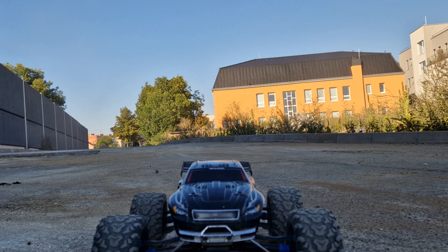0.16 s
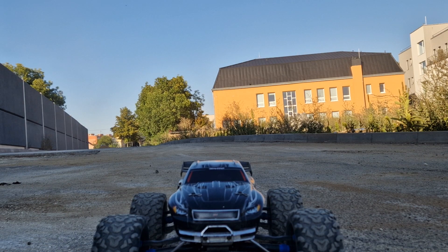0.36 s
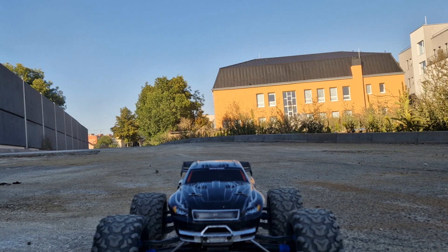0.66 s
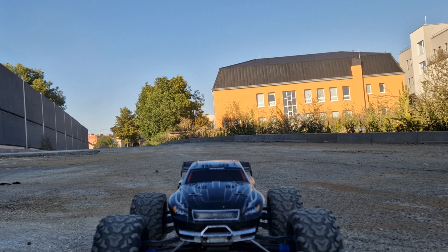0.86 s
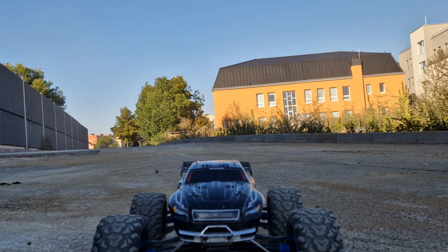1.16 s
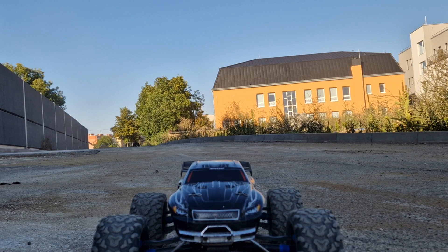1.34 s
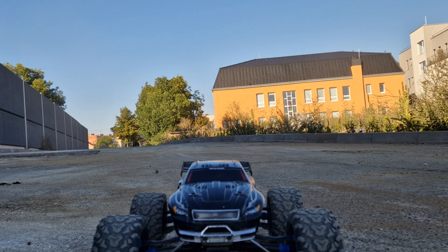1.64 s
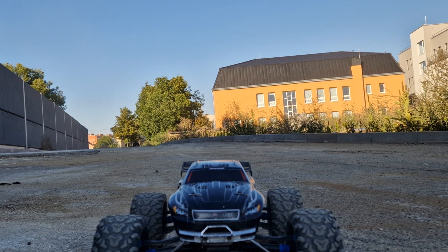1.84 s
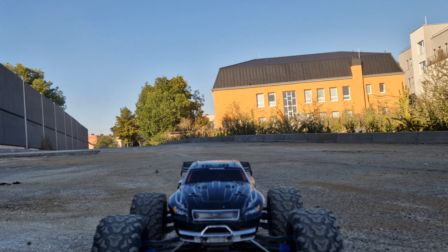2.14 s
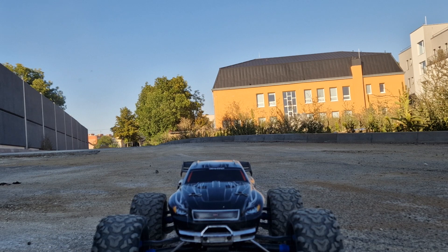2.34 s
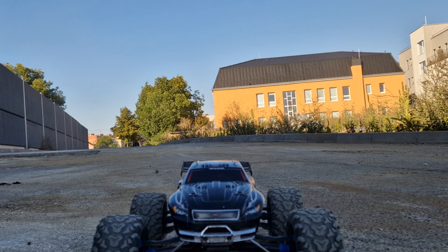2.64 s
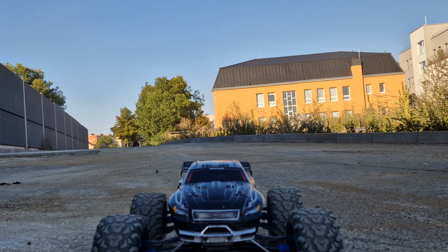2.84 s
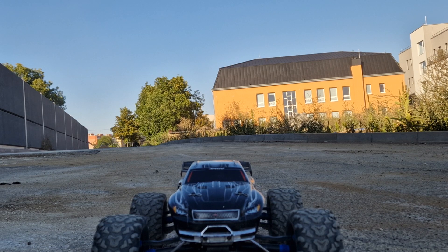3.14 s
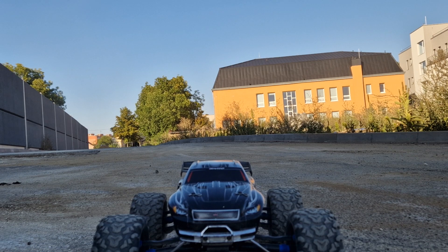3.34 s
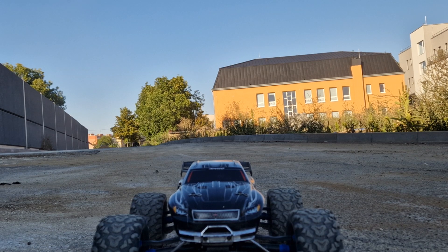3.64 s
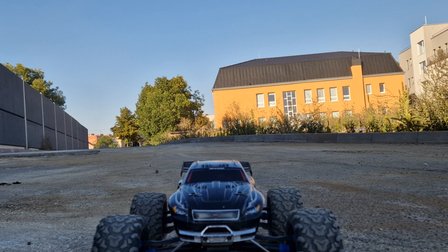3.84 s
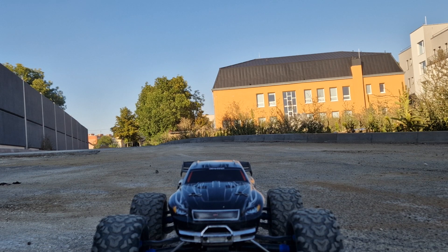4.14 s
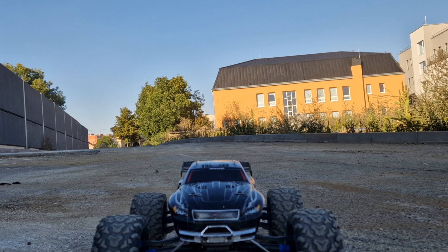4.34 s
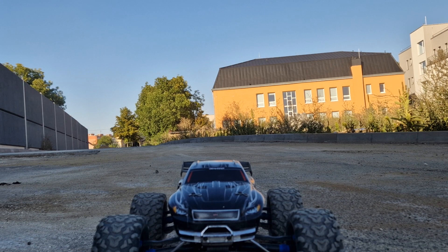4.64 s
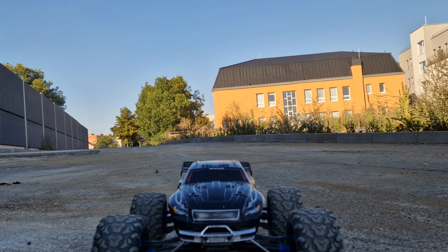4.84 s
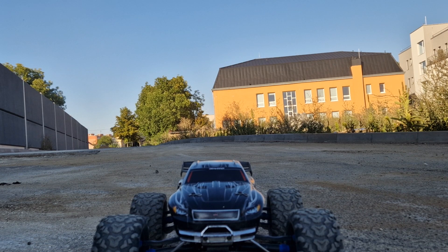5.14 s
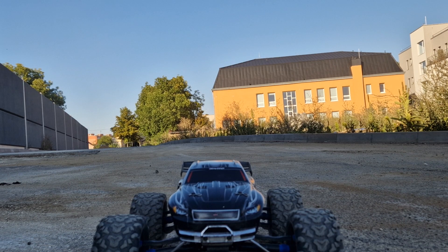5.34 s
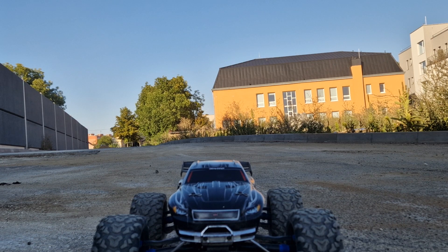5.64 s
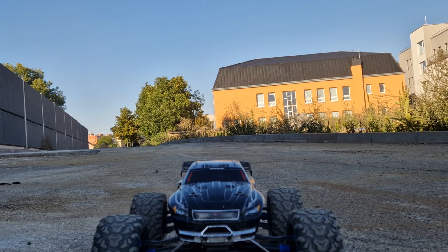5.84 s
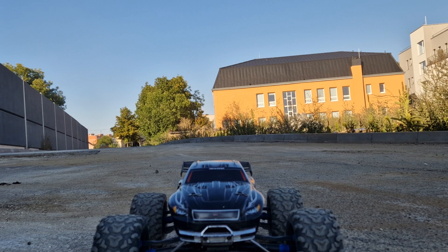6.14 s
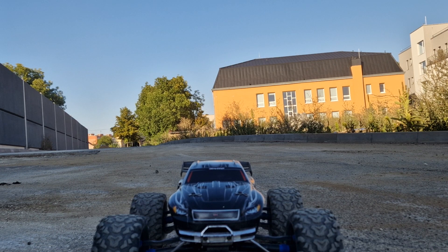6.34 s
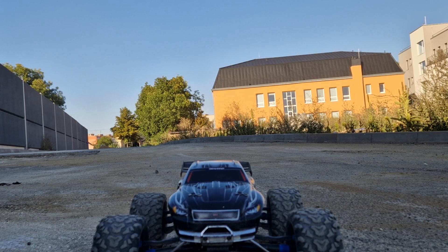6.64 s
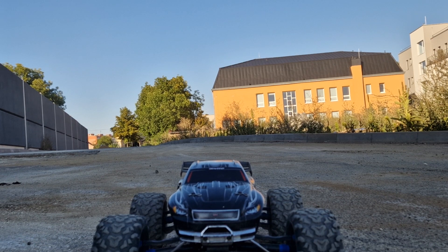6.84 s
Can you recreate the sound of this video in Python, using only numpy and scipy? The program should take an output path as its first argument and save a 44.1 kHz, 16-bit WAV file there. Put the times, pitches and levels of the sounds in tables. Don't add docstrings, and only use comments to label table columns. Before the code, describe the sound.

Buzzing, crackling idle of a small model truck engine cuts out midway; quiet yard follows with faint ticks and an approaching car.

```python
import sys
import numpy as np
from scipy import signal
from scipy.fft import rfft, irfft, next_fast_len
from scipy.io import wavfile
from scipy.ndimage import uniform_filter1d, map_coordinates

SR = 44100
rng = np.random.default_rng(int(sys.argv[2]) if len(sys.argv) > 2 else 0)


def gain_from_db(level_db):
    decades = np.asarray(level_db, float) / 20
    return 10 ** decades


def unload_wav(signal):
    wavfile.write(
        sys.argv[1],
        SR,
        np.round(np.clip(np.atleast_2d(signal).T, -1, 1) * 32767).astype(np.int16),
    )


N = 308259
T = np.arange(N) / SR
STALL_S = 3.618


def level(x, db):
    return x * gain_from_db(db) / np.sqrt(np.mean(x ** 2))


def noise(points, channels=1):
    hz, db = np.transpose(points)
    size = next_fast_len(N)
    f = np.fft.rfftfreq(size, 1 / SR) + 1
    shape = gain_from_db(np.interp(np.log(f), np.log(hz), db, left=-90, right=-90))
    white = rng.standard_normal((channels, size))
    return level(irfft(rfft(white) * shape, size)[:, :N], 0)


def walk(rate_hz):
    k = int(SR / rate_hz)
    held = np.repeat(rng.standard_normal(N // k + 1), k)
    return 1.3 * uniform_filter1d(uniform_filter1d(held, k), k)[:N]


def strike(s, size, hz, t60_s):
    pole = 2j * np.pi * hz / SR - np.log(1000) / (t60_s * SR)
    at = np.clip(np.ceil(s * SR), 0, N - 1)
    x = np.zeros(N, complex)
    np.add.at(x, at.astype(int), size * np.exp(pole * (at - s * SR)))
    end = int(at.max() + 2 * t60_s * SR)
    x[:end] = signal.lfilter([1], [1, -np.exp(pole)], x[:end])
    return x


def pan(x, left_minus_right_db):
    return x * gain_from_db(np.array([[left_minus_right_db], [-left_minus_right_db]]) / 2)


def late(x, samples):
    return map_coordinates(x, [np.arange(N) - samples], order=1)


# time in seconds, speed in turns/s.
CRANK_SPEED = [
    (0, 108),
    (2.55, 106),
    (2.8, 103),
    (3.39, 100),
    (3.44, 91),
    (3.62, 85),
]
# first burn in seconds, its ring in dB, spacing in turns, change in dB per burn.
BURN_RUNS = [(-.0216, -26, 3, 0), (.1541, -22, 3, -1.8), (.309, -26.5, 3, 2.5), (.4177, -29, 4, 2),
             (.5191, -25, 3, -2.5), (.6121, -21, 3, -3), (.7426, -19, 3, -7), (.8245, -20, 3, -6),
             (.9173, -23, 4, 2), (.9813, -23, 3, -1.4), (1.0924, -22, 3.3, -1.4), (1.2211, -22, 3, -4),
             (1.3138, -23, 3, -.7), (1.547, -23, 4, .7), (1.6497, -20, 3, -5), (1.7424, -24, 3.4, -2),
             (1.8651, -25, 4, 2), (1.9305, -18, 3.55, -2.2), (2.1353, -21, 3.45, -1.5),
             (2.2775, -21, 3, -2.5), (2.4284, -19, 3.3, -1), (2.6158, -24, 3.4, -2),
             (2.6838, -21, 3.8, -1.5), (2.8676, -24, 2, 0), (2.9546, -20, 3, -7), (3.0127, -25, 2, .4),
             (3.1198, -24, 2, 1), (3.1869, -22.5, 3.2, -.3), (3.4707, -23, 3, 1.5), (3.5849, -20, 4, 0)]


def turns():
    scatter_db, stray_db, stray_share = 1.5, -30, .3
    kick, kick_kept, kick_slow_power = .055, .55, 3.0
    s, db, every, change_db = np.transpose(BURN_RUNS)
    speed_s, speed = np.transpose(CRANK_SPEED)
    edge = np.r_[s, STALL_S]
    span = np.diff(edge)
    turned = np.cumsum(np.interp(T + s[0], speed_s, speed)) / SR
    count = np.round(np.diff(np.interp(edge, T + s[0], turned))).astype(int)
    run = np.repeat(np.arange(len(s)), count)
    k = np.concatenate([np.arange(c) for c in count])
    nth = np.round(k / every[run])
    due = (np.round(nth * every[run]) == k) & (k < count[run] - 1)
    luck = rng.random(len(k))
    scatter = scatter_db * rng.standard_normal(len(k)) * (k > 0)
    ring_db = np.where(due, db[run] + nth * change_db[run], stray_db) + scatter
    steady = s[run] + span[run] * k / count[run]
    slow = speed[0] / np.interp(steady, speed_s, speed)
    burn = gain_from_db(ring_db + 23) * (due | (luck * slow ** 10 < stray_share))
    push = signal.lfilter([1], [1, -kick_kept], burn)
    period = slow * (1 - kick * slow ** kick_slow_power * push)
    gone = np.cumsum(period) - period
    share = (gone - gone[k == 0][run]) / np.bincount(run, period)[run]
    return s[run] + span[run] * share, burn


# frequency in Hz, t60 in seconds, level in dB on a lean turn,
# level in dB on a hard burn, left minus right in dB, left lead in radians.
PIPE_MODES = [(375, 0.028, -30, -56, 7, 0.24), (483, 0.047, -23.5, -25, 3, 0.22),
              (575, 0.028, -17.5, -33, 0.5, 0.03), (670.6, 0.038, -22.5, -22, -1.5, 0.55),
              (1051.6, 0.04, -19.5, -27.5, 4.5, -1.54), (1159, 0.026, -80, -24, 6.5, 2),
              (1474, 0.046, -26, -32, 16.5, -0.05), (1545, 0.043, -25, -15.5, -1.5, -0.01),
              (1618, 0.057, -18.5, -19.5, 2.5, 0.56), (1806, 0.12, -35, -28.5, 8, 0.5),
              (2125, 0.022, -34, -32.5, -11.5, 3.5), (2375, 0.059, -38.5, -26.5, 3, 1.8),
              (2507, 0.037, -48.5, -37.5, -9.5, 3.5), (3019, 0.13, -52, -53.5, 19, 0.1),
              (3325, 0.051, -40.5, -43, -1, -0.3), (5490, .021, -33.5, -18.5, 4.5, -0.25),
              (5180, 0.012, -30, -27, -3, 3.5), (3900, 0.054, -57.5, -61, -17, .3),
              (7890, 0.027, -43, -38, 12, -2.6)]


def pipe_and_shell(s, burn, slow, size_luck, start_luck):
    burn_lead_s, puff_lead_s, low_lead_s = .0001, .0013, .0009
    pressure = np.tanh(signal.lfilter([0, 1], [1, -.4], burn))
    early_s = .00035 * pressure + .00007 * slow ** 5 * size_luck
    shell = strike(s - burn_lead_s, gain_from_db(-23) * burn, 1360, 0.0015).imag
    lows = 0
    for hz, t60_s, lean_db, burn_db, pan_db, lead_rad in PIPE_MODES:
        low = hz < 900
        rough = min(hz / 1500, 1)
        own_size, own_start = hz / 2500 * rng.standard_normal((2, len(s)))
        scatter_db = 1.2 * rough * size_luck + 1.6 * own_size
        fullness = slow ** np.interp(hz, [350, 500, 1050, 1510], [1.0, 0.0, 3.5, -2.5])
        soft = gain_from_db(lean_db + scatter_db) * np.clip(1 - 0.71 * burn, 0, 1) * fullness
        hard = gain_from_db(burn_db + scatter_db / 3) * burn ** np.clip(hz / 5500, .5, 1)
        start = s - (low_lead_s if low else puff_lead_s) + .00015 * rough * start_luck + .000025 * own_start
        start = start - early_s * (hz < 1300)
        hard_start = start if low else s - burn_lead_s
        ring = strike(np.r_[start, hard_start], np.r_[soft, hard], hz, t60_s)
        ring = ring - strike(start, soft, hz, 0.0014 + hz / 3400000.0)
        swell_t60_s = 0.0041 if hz > 4500 else .002 if low else 0.00088
        ring = ring - strike(hard_start, hard, hz, swell_t60_s)
        turned = ring * np.exp(.5j * lead_rad * np.array([[1], [-1]]))
        mode = pan(turned.imag, pan_db)
        if low:
            lows = lows + mode
        else:
            shell = shell + mode
    lows = signal.sosfilt(signal.cheby1(6, 1, 290, "high", fs=SR, output="sos"), lows)
    return lows + signal.lfilter(*signal.butter(1, 500, "high", fs=SR), shell)


# frequency in Hz, t60 in seconds, level in dB.
CHASSIS_MODES = [(109.2, 0.051, -29), (213, 0.044, -35.5)]


def chassis_thump(s, size_luck):
    return -sum(strike(s, gain_from_db(db + 1.2 * size_luck), hz, t60_s).imag for hz, t60_s, db in CHASSIS_MODES)


# frequency in Hz, t60 in seconds, level in dB.
INTAKE_MODES = [(7430, 0.036, -45), (8300, 0.0022, -28.5), (9540, 0.0054, -46), (15000, .015, -54)]
# frequency in Hz, density in dB per Hz.
GAS_COLOUR = [(1100, 9), (1800, -13), (2600, -2), (3600, -10.5), (4400, -12.5), (6000, -10), (8000, -22.5),
              (9000, -23.5), (10400, -10), (11500, -22.5), (16500, -18.5)]


def gas(s, burn, start_luck):
    rings = 0
    for hz, t60_s, db in INTAKE_MODES:
        size = gain_from_db(db + 2.5 * rng.standard_normal(len(s)))
        rings = rings + strike(s - .0028, size, hz, t60_s).imag
    intake = strike(s - .003, gain_from_db(1.7 * start_luck), 0, 0.022).real
    blast = strike(s - .0004, 0.47 * burn, 0, 0.13).real
    running = np.clip((STALL_S - T) / 0.022, 0, 1)
    flow = .5 * running + intake + blast
    shared = noise(GAS_COLOUR)[0] * gain_from_db(-40.0) * flow + rings
    apart = noise(GAS_COLOUR, channels=2) * gain_from_db(-39.5) * flow
    return pan(apart + np.array([late(shared, 0.98), shared]), 1.0)


# left delay in ms, right delay in ms, level in dB.
ECHOES = [
    (0.311, 0.78, -22),
    (1.296, 0.889, -13),
    (2.9, 3.6, -19.5),
]


def engine():
    s, burn = turns()
    slow = CRANK_SPEED[0][1] * np.gradient(s)
    size_luck, start_luck = rng.standard_normal((2, len(s)))
    out = pipe_and_shell(s, burn, slow, size_luck, start_luck)
    out = out + chassis_thump(s, size_luck) + gas(s, burn, start_luck)
    echoes = 0
    for left_ms, right_ms, db in ECHOES:
        delayed = [late(c, ms * SR / 1000) for c, ms in zip(out, (left_ms, right_ms))]
        echoes = echoes + gain_from_db(db) * np.array(delayed)
    return out + echoes


# time in seconds, level in dB, centre in Hz, width in Hz,
# t60 in seconds, left minus right in dB.
SCUFFS = [(3.62, -19.5, 2980, 9200, 0.04, 3.5), (3.629, -42, 2950, 8760, 0.27, 2),
          (3.672, -44, 4942, 9107, 0.067, 0), (3.68, -64, 3700, 500, 0.74, 18),
          (3.735, -62, 5000, 12000, .2, 6), (3.815, -57, 3500, 9000, 0.16, 6),
          (4.05, -63, 4000, 9000, .1, 4), (4.572, -49.5, 2480, 4470, 0.084, 12),
          (4.587, -50.5, 3501, 4498, .05, 12), (5.1971, -40, 3503, 3960, 0.0054, 0),
          (5.2, -46, 2800, 3000, 0.035, 6), (5.206, -30, 1670, 1800, 0.026, 1),
          (5.2062, -44.5, 4498, 6000, 0.023, -2)]


def scuffs():
    out = 0
    for s, db, hz, width_hz, t60_s, pan_db in SCUFFS:
        bottom_hz = max(hz - width_hz / 2, hz / 5) / 2
        colour = [(bottom_hz, -24), (hz, 0), (hz + width_hz, -12), (hz + 3 * width_hz, -40)]
        fade = strike(np.array([s]), gain_from_db(db), 0, t60_s).real
        out = out + pan(noise(colour, channels=2) * fade, pan_db)
    return out


# time in seconds, level in dB, third-mode gain in dB, fourth-mode gain in dB.
PINGS = [
    (4.886, -56.5, 4, -1),
    (4.898, -60, 10, -8),
    (6.884, -41.5, -14, 4),
    (6.895, -50, -12, 11),
    (6.943, -45, -14, -10),
]
# frequency in Hz, level in dB, t60 in seconds.
PING_MODES = [(3480, 1, 0.25), (3530, -1, 0.26), (4860, -11, .1), (6300, -7, .02)]


def pings():
    s, db, third_db, fourth_db = np.transpose(PINGS)
    out = 0
    for (hz, mode_db, t60_s), more_db in zip(PING_MODES, (0, 0, third_db, fourth_db)):
        out = out + strike(s, gain_from_db(db + mode_db + more_db), hz, t60_s).imag
    return pan(out, 1.1)


def yard(x):
    t60_s, damp_hz, wet_db = 1.0, 3000, -34
    t = T[:SR]
    tail = rng.standard_normal((2, SR)) * gain_from_db(-60 * t / t60_s) * (t > .02)
    tail = signal.lfilter(*signal.butter(1, damp_hz, fs=SR), tail)
    tail = tail / np.sqrt(np.sum(tail ** 2) / 2)
    return gain_from_db(wet_db) * signal.fftconvolve(x, tail, axes=1)[:, :N]


def drone(s, hz, db, orders, wobble, flicker_db):
    speed_hz = np.interp(T, s, hz) * (1 + wobble * walk(20))
    phase = 2 * np.pi * np.cumsum(speed_hz) / SR
    tone = sum(gain_from_db(g + flicker_db * walk(14)) * np.sin(m * phase) for m, g in orders)
    return np.sqrt(2) * tone * gain_from_db(np.interp(T, s, db))


# time in seconds, second order in Hz, level in dB.
CAR_ENGINE = [(3.0, 143.5, -35), (3.27, 143.7, -38), (3.5, 153.9, -33.5), (3.54, 166.1, -38),
              (3.61, 155.7, -37), (4.21, 173.1, -42.5), (4.32, 179.5, -47), (5.08, 207.0, -39),
              (5.52, 216.8, -44.5), (6.26, 219.0, -37.5), (6.93, 219.8, -36.5), (6.99, 224.6, -35.5)]
# multiple of the second order, level in dB.
CAR_ORDERS = [(.5, -4), (1.5, -11.5), (2, -23), (2.5, -19), (2.77, -20)]
# time in
# seconds, gain in dB.
HISS_GAIN = [
    (3.7, -4),
    (4.36, -14),
    (4.93, -13),
    (5.5, -7),
    (5.89, 0),
    (6.45, 5.5),
    (6.63, 5.5),
    (6.99, 9.5),
]
# time in seconds, ground-echo lag in ms, left port lag in samples.
CAR_PATH = [
    (4, 0.94, 6.13),
    (5.4, 0.726, 6),
    (6, 0.64, 14),
    (7, 0.6, 15),
]
# frequency in Hz, density in dB per Hz.
ROAR_COLOUR = [(150, -30), (250, -7), (321, -5.5), (434, -13), (665, -10), (1260, -14.5), (1900, -22.5),
               (5000, -53.5), (6500, -70), (11000, -120)]
# frequency in Hz, density in dB per Hz.
HISS_COLOUR = [(470, -30), (800, -10.5), (1040, -0.5), (1880, -14.5), (3510, -14.5), (3790, -14.5),
               (11800, -34), (16000, -46)]


def car():
    near_db = np.interp(T, *np.transpose(HISS_GAIN))
    roar_db, hiss_db = -46.5 + 0.09 * near_db, -55.5 + near_db
    path_s, ground_ms, port_lag = np.transpose(CAR_PATH)
    ground_ms, port_lag = np.interp(T, path_s, ground_ms), np.interp(T, path_s, port_lag)
    roar = noise(ROAR_COLOUR, channels=2) * gain_from_db(roar_db + 2.0 + 1.15 * walk(9))
    hiss = [c + .24 * late(c, ground_ms * SR / 1000) for c in noise(HISS_COLOUR, channels=3)]
    hiss = np.array(hiss) * gain_from_db(hiss_db + 0.86 * walk(14))
    s, hz, db = np.transpose(CAR_ENGINE)
    orders_db = 1 + 0.31 * np.interp(np.maximum(s, 4.4), *np.transpose(HISS_GAIN))
    motor = drone(s, hz, db, [(0.99, 0.0083)], 0.0046, 1.35)
    motor = motor + drone(s, hz, db + orders_db, CAR_ORDERS, 0.00453, 1.4)
    fade_in = np.clip((T - 2.9) / 0.36, 0, 1)
    direct = hiss[0] + noise(ROAR_COLOUR)[0] * gain_from_db(roar_db - 4.5) + motor * fade_in
    return roar + 2.02 * hiss[1:] + np.array([late(direct, port_lag), direct])


# time in seconds, firing note in Hz, level in dB.
LORRY_ENGINE = [(0.0, 99.4, -34), (0.06, 101.5, -31), (0.17, 110.2, -26.5), (0.37, 108.4, -38),
                (0.54, 101.9, -35), (0.66, 93.6, -38), (0.74, 89.6, -31), (1.48, 76.5, -29),
                (1.63, 69.2, -30.5), (1.93, 68.8, -35), (5.02, 68.5, -36.5), (5.59, 67.46, -33.5),
                (5.82, 60.5, -33.5), (6.09, 59, -25), (6.58, 60.64, -36.5), (6.64, 61.7, -46),
                (6.81, 63, -33), (6.99, 61, -50)]


def lorry():
    return drone(*np.transpose(LORRY_ENGINE), [(1, 0), (2, -15)], 0.015, 2.2)


# frequency in Hz, density in dB per Hz.
RUMBLE_COLOUR = [(29, -52), (50, 1), (83, -1), (118, -10), (191, -7.5), (248, -20.5), (327, -29),
                 (400, -25.5), (520, -64), (880, -120)]
# frequency in Hz, density in dB per Hz.
DEEP_COLOUR = [(13, -41), (22, -20), (60, -3), (78, -4), (130, -120)]
# centre in seconds, level in dB, length in seconds.
DEEP_SWELLS = [
    (0.273, -32.5, 0.28),
    (1.03, -32, 0.28),
    (1.576, -31, 0.14),
    (3.1, -40, .3),
    (4.443, -34, 0.13),
    (4.79, -38, 0.097),
]


def town_rumble():
    low = noise(RUMBLE_COLOUR) + 0.27 * noise(RUMBLE_COLOUR, channels=2)
    low = low * gain_from_db(-34.5 + 2.0 * walk(7.9))
    swell = sum(gain_from_db(db) * np.exp(-((T - s) / length_s) ** 2) for s, db, length_s in DEEP_SWELLS)
    return low + noise(DEEP_COLOUR) * (gain_from_db(-43.5) + swell)


def scene():
    close = engine() + scuffs() + pings()
    return close + yard(close) + car() + lorry() + town_rumble()


def roll_off(x):
    return signal.sosfilt(signal.butter(12, 16930, fs=SR, output="sos"), x)


def record(dry):
    rounded = np.tanh(1.135 * dry) / 1.127
    mix = signal.sosfilt(signal.butter(2, 36, "high", fs=SR, output="sos"), rounded)
    return roll_off(mix)


dry = scene()
out = record(dry)
unload_wav(out)
```